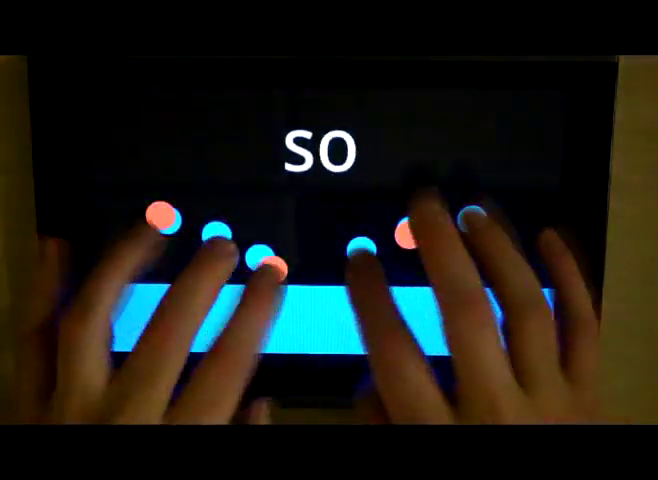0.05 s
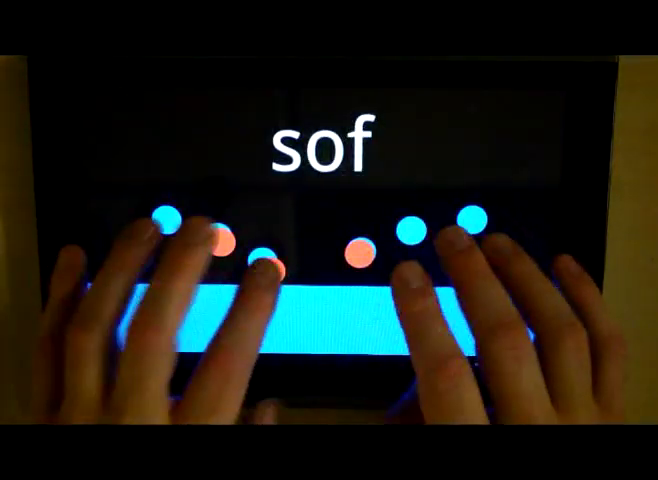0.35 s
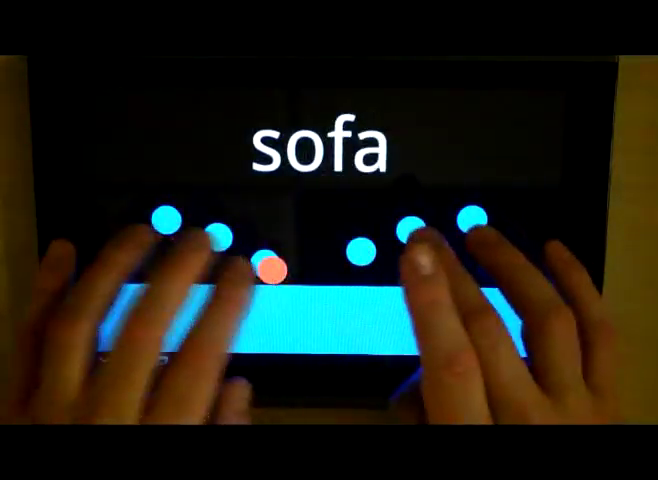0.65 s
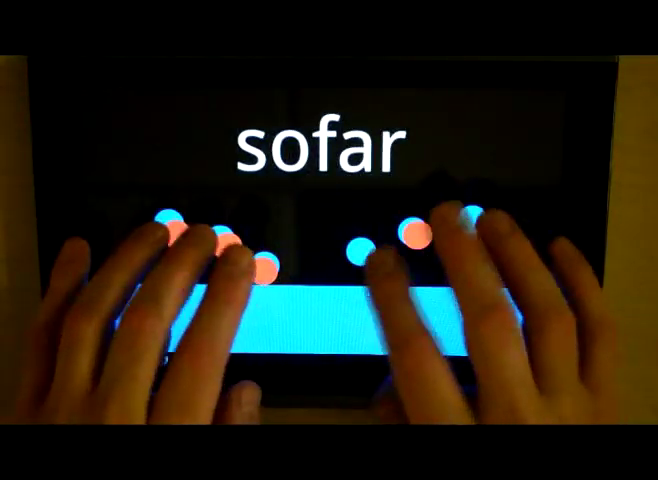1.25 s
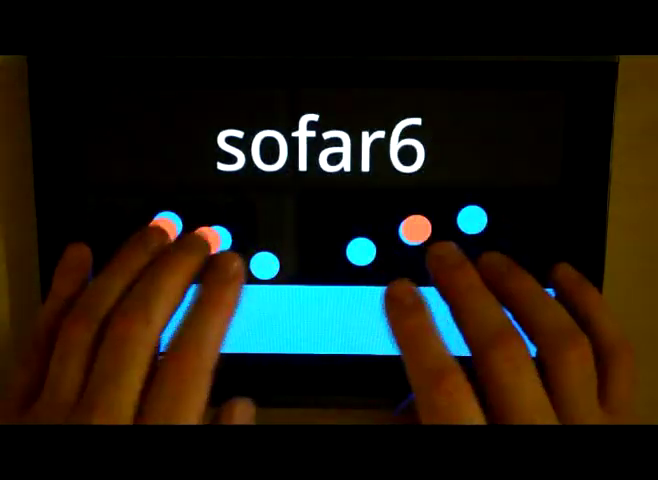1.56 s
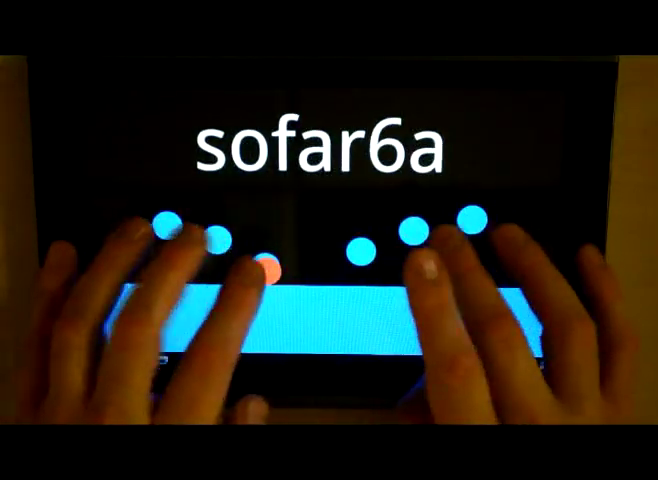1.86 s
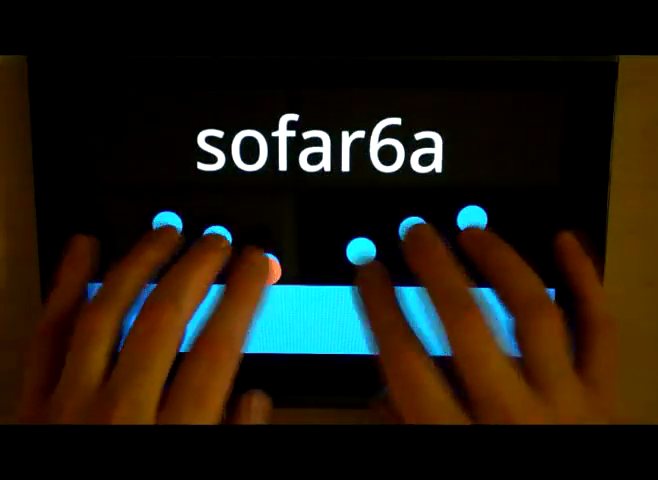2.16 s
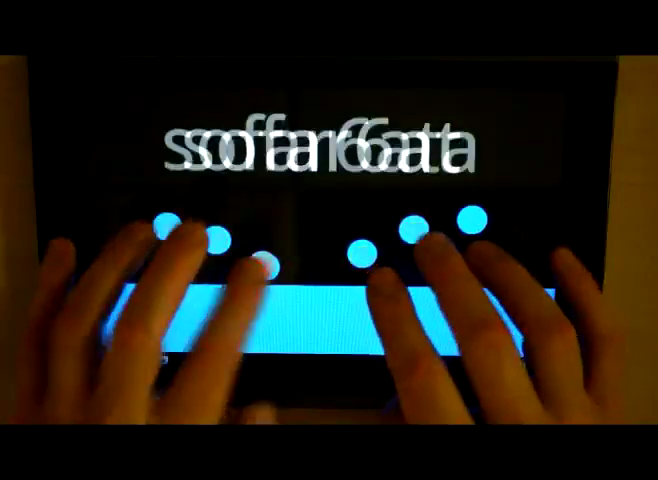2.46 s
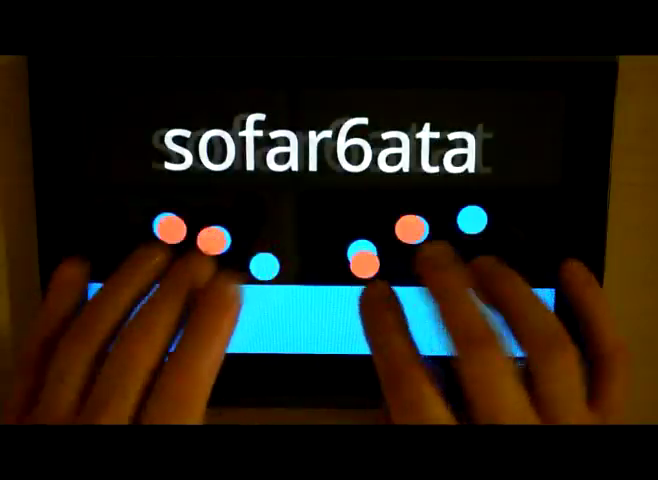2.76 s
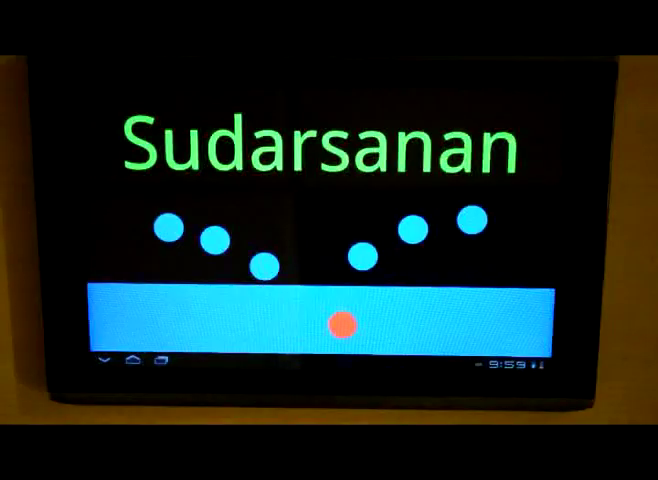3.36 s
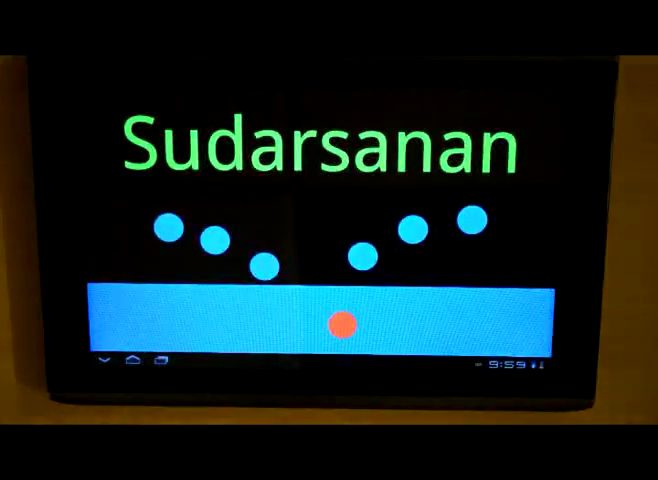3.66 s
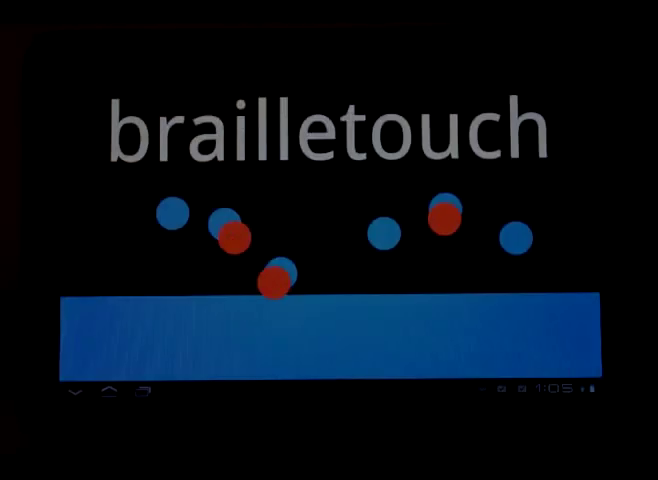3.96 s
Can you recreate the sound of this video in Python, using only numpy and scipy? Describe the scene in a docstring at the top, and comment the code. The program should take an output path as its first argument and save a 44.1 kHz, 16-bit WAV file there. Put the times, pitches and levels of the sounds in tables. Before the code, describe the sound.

A few scattered fingertip taps click on a tablet's glass, three sharp and two soft, over low indoor room noise. Afterwards a hand brushes past, the table bumps dully, and skin squeaks briefly on the glass.

```python
"""Fingers type on a tablet lying on a table in a small room, over low room noise.
A sharp tap, two soft fumbled ones and two more sharp ones ring its glass and case.
After a faint rub and a short silent break a hand brushes by and the table takes a dull bump.
A last rub squeaks as skin sticks and slips on the glass; the sound stops at 3.88 s."""
import sys
import numpy as np
from scipy import signal
from scipy.fft import rfft, irfft
from scipy.io import wavfile
from scipy.ndimage import uniform_filter1d

SR = 44100
rng = np.random.default_rng(int(sys.argv[2]) if len(sys.argv) > 2 else 0)


def unload_wav(signal):
    """Save mono or channel-first audio to the path in sys.argv[1] as 16-bit WAV at rate SR, clipped to [-1, 1]."""
    wavfile.write(
        sys.argv[1],
        SR,
        np.round(np.clip(np.atleast_2d(signal).T, -1, 1) * 32767).astype(np.int16),
    )


N = 176400


def taps(t):
    """Nails strike and fingertips skid; each contact rings the tablet, clicks and excites the room."""
    # sharp taps: t/s, level/dB, nail click re level/dB
    sharp_taps = [(.2108, -21, 2.5), (2.5201, -18.5, 2.5), (2.8305, -18.5, 2)]
    # soft taps: t/s, level/dB, skid length/s
    soft_taps = [(.4788, -31, 0.0094), (2.2804, -29, 0.013)]
    body_db, skid_click_db, room_db, skid_room_db = -5, -2, -20, 9.5
    blows, nails, skids = np.zeros((3, N))
    for s, db, click_db in sharp_taps:
        blows[int(s * SR)] += undb(db)
        nails[int(s * SR)] += undb(db + click_db)
    for s, db, length_s in soft_taps:
        skid = rng.standard_normal(N) * (t >= s) * (t < s + length_s)
        skids += undb(db) * skid / np.linalg.norm(skid)
    skids = cut(skids, hz=400, kind="high", order=1)
    body = undb(body_db) * conv(blows + skids, tablet_body(t))
    clicks = conv(nails + undb(skid_click_db) * skids, glass_click(t))
    direct = body + clicks
    reverb = undb(room_db) * conv(blows + undb(skid_room_db) * skids, room_tail(t))
    return direct + reflections(t, direct) + reverb


def tablet_body(t):
    """Struck tablet: the thin case radiates little bass, the fingertip softens the treble."""
    # tablet modes: f/Hz
    modes_hz = [602, 735, 828, 987, 1151, 1328, 1516, 1656, 1790, 1902, 2051, 2258, 2388, 2950, 3118, 3300]
    # tablet modes: level/dB
    modes_db = [-6, -8, -9, -4, -8, 2, -7, -5, -13, -6, -8, -13, -8, -18, -16, -18]
    radiate_hz, contact_hz = 540, 3730
    modes = chord(t, modes_hz, modes_db, t60_s=0.045)
    radiated = cut(modes, radiate_hz, "high", order=4)
    return -cut(radiated, contact_hz, "low", order=6)


def glass_click(t):
    """Contact click: a noise crack plus the high glass modes that a nail excites."""
    # crack spectrum: f/Hz, level/dB
    spectrum = [(300, -20), (500, -9), (750, 10), (1300, 1), (2400, 5.5), (3200, 0.5), (3900, -16),
                (5000, -10.5), (8000, -12), (11000, -34.5)]
    # glass modes: f/Hz
    modes_hz = [4330, 4950, 6430, 7240, 7650, 7950]
    # glass modes: level/dB
    modes_db = [-25.5, -36, -36.5, -28.5, -28, -50]
    crack = unit(colour(rng.standard_normal(N), spectrum)) * fade(t, t60_s=0.029) * undb(-12.5)
    return crack + chord(t, modes_hz, modes_db, t60_s=0.021)


def bump(t):
    """A few soft pushes in quick succession ring the table."""
    # pushes: t/s, level/dB
    push_list = [(3.2112, -41.5), (3.2163, -37), (3.2215, -42), (3.2318, -37)]
    # table modes: f/Hz, level/dB, T60/s
    table_modes = [(201, 5.5, 0.06), (303, 6, 0.059), (375, -2.5, 0.12), (610, -6.5, 0.068), (721, 3, .06),
                   (840, -4, 0.055), (1125, -10, 0.067)]
    pushes = np.zeros(N)
    for s, db in push_list:
        pushes[int(s * SR)] -= undb(db)
    return conv(pushes, ring(t, table_modes))


def rubs(t):
    """Grainy friction of hand and sleeve swells and dies away, with fine hiss on top."""
    # strokes: t/s, length/s, level/dB, centre/Hz, width per filter pass/Hz, hiss re level/dB
    strokes = [(3.04, 0.067, -59.5, 1800, 2500, -2.5), (3.15, 0.32, -50.5, 1460, 2370, -10),
               (3.326, .1, -41.5, 1080, 900, -36), (3.802, 0.028, -38, 1080, 1300, -33),
               (3.803, 0.078, -42, 2160, 1650, -32.5)]
    attack_fraction, grain_db = 0.21, 1
    friction = np.zeros(N)
    for s, length_s, db, hz, width_hz, hiss_db in strokes:
        swell = np.sqrt(np.interp((t - s) / length_s, [0, attack_fraction, 1], [0, 1, 0]))
        body = unit(band(band(rng.standard_normal(N), hz, width_hz), hz, width_hz))
        hiss = unit(band(rng.standard_normal(N), hz=6000, width_hz=23000))
        grain = undb(grain_db * walk(rate_hz=200))
        friction += undb(db) * swell * (body * grain + undb(hiss_db) * hiss)
    return friction


def squeak(t):
    """Skin on glass: a few milliseconds of rough stick-slip, falling in pitch."""
    peak_s, sigma_s, peak_db = 3.8152, 0.0031, -28
    centre_hz, fall_per_s, roughness = 1800, 45, .2
    glide_s = np.clip(t - peak_s, -.008, .008)
    hz = centre_hz * np.exp(-fall_per_s * glide_s) * (1 + roughness * walk(rate_hz=1500))
    envelope = np.exp(-((t - peak_s) / sigma_s) ** 2 / 2)
    return undb(peak_db) * envelope * np.sin(2 * np.pi * np.cumsum(hz) / SR)


def reflections(t, direct):
    """Early echoes from table and hands."""
    # echoes: delay/s, level/dB
    echoes = [(.0031, -20), (.0090, -26.5), (0.0119, -11.5)]
    return sum(undb(db) * np.interp(t - delay_s, t, direct, left=0) for delay_s, db in echoes)


def room_tail(t):
    """Diffuse room response: builds quickly, then decays."""
    # tail spectrum: f/Hz, level/dB
    spectrum = [(300, 6), (600, 5.5), (1100, 16), (1330, 5), (1600, 0.5), (2100, 8), (2450, 8), (2800, -8),
                (3300, -6), (4200, -22), (8000, -20), (11000, -31)]
    build_s = .007
    diffuse = unit(colour(rng.standard_normal(N), spectrum))
    return diffuse * fade(t, t60_s=0.28) * np.minimum(t / build_s, 1)


def room_noise(t):
    """Low rumble under a dull rush, slowly growing."""
    # noise spectrum: f/Hz, relative density/dB
    spectrum = [(20, -10.5), (40, -9.5), (70, -3.5), (110, -0.5), (150, 3), (185, -1), (240, -9.5),
                (320, -6.5), (440, -12.5), (650, -12), (950, -15.5), (1300, -19.5), (2000, -23.5),
                (3000, -29.5), (5000, -39.5), (8000, -44.5), (11000, -47.5)]
    # gain curves: t/s, bass/dB, upper band/dB
    gains = [(0, -46, -45), (.12, -42, -43.5), (1.4, -43, -43.5), (2.1, -41, -41.5), (2.4, -38.5, -41.5),
             (3.1, -41.5, -40.5), (3.55, -38, -39), (3.88, -40, -40.5)]
    split_hz = 278
    s, bass_db, upper_db = np.array(gains).T
    air = unit(colour(rng.standard_normal(N), spectrum))
    bass = cut(cut(air, split_hz, "low")[::-1], split_hz, "low")[::-1]  # zero phase
    return bass * undb(np.interp(t, s, bass_db)) + (air - bass) * undb(np.interp(t, s, upper_db))


def undb(db):
    """Decibels to gain."""
    return 10 ** (np.asarray(db) / 20)


def unit(x):
    """Scale to rms 1."""
    return x / np.sqrt(np.mean(x ** 2))


def fade(t, t60_s):
    """Exponential decay from time zero."""
    return (t >= 0) * np.exp(-np.log(1000) * np.maximum(t, 0) / t60_s)


def conv(x, response):
    """Apply an impulse response."""
    return signal.fftconvolve(x, response)[:N]


def colour(x, points):
    """Filter by a curve of f/Hz, level/dB."""
    hz, db = np.array(points).T
    f = np.maximum(np.fft.rfftfreq(N, 1 / SR), 1)
    return irfft(rfft(x) * undb(np.interp(np.log(f), np.log(hz), db)), N)


def band(x, hz, width_hz):
    """One broad resonance."""
    g, k = np.tan(np.pi * min(hz, SR / 3) / SR), width_hz / hz
    return signal.lfilter([g * k, 0, -g * k], [1 + g * k + g * g, 2 * g * g - 2, 1 - g * k + g * g], x)


def cut(x, hz, kind, order=2):
    """Low-pass or high-pass."""
    return signal.sosfilt(signal.butter(order, hz, kind, fs=SR, output="sos"), x)


def walk(rate_hz):
    """Smooth random wander, spread near 1."""
    return np.interp(np.arange(N) / SR * rate_hz, np.arange(N), rng.standard_normal(N))


def ring(t, modes):
    """Decaying modes struck at time zero."""
    return sum(undb(db) * np.sin(2 * np.pi * hz * t) * fade(t, t60_s) for hz, db, t60_s in modes)


def chord(t, modes_hz, levels_db, t60_s):
    """Modes with one decay time."""
    return ring(t, [(hz, db, t60_s) for hz, db in zip(modes_hz, levels_db)])


def scene():
    """All sources central; a faint, slightly smeared side signal gives the treble a trace of width."""
    # side spectrum: f/Hz, level re mid/dB
    side_spectrum = [(250, -64.5), (450, -48.5), (700, -42), (1400, -35), (2800, -15), (5600, -30),
                     (10000, -9.5)]
    t = np.arange(N) / SR
    mid = taps(t) + bump(t) + rubs(t) + squeak(t) + room_noise(t)
    smear = rng.standard_normal(N) * fade(t, t60_s=0.0036)
    side = colour(conv(mid, smear / np.linalg.norm(smear)), side_spectrum)
    return np.array([mid + side, mid - side])


def record(dry):
    """The sound drops out once and stops early; the top is cut."""
    # silences: start/s, end/s
    silences = [(3.116, 3.149), (3.881, 4.1)]
    top_hz = 11030
    t = np.arange(N) / SR
    gate = 1. - sum((t > start_s) & (t < end_s) for start_s, end_s in silences)
    gate = uniform_filter1d(gate, size=90)  # 2 ms ramps
    return signal.sosfilt(signal.ellip(10, .2, 80, top_hz, fs=SR, output="sos"), dry * gate)


dry = scene()
out = record(dry)
unload_wav(out)
```